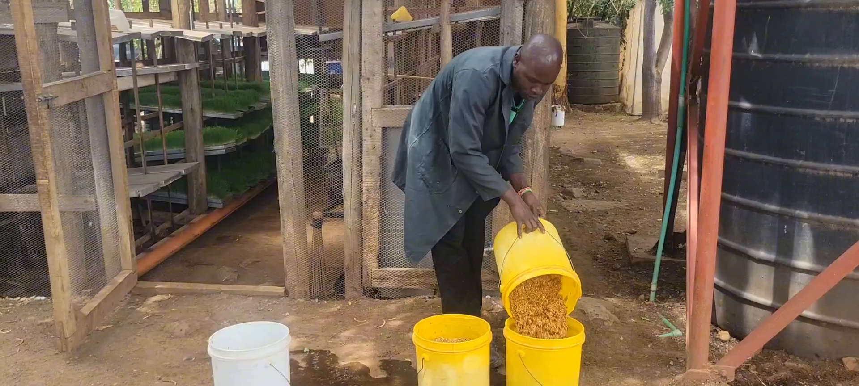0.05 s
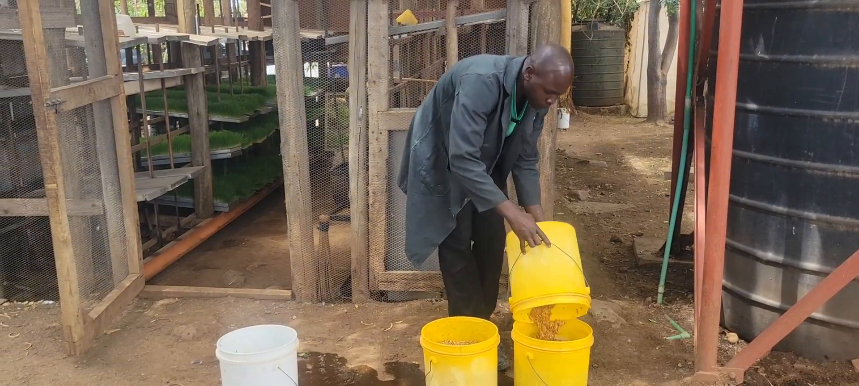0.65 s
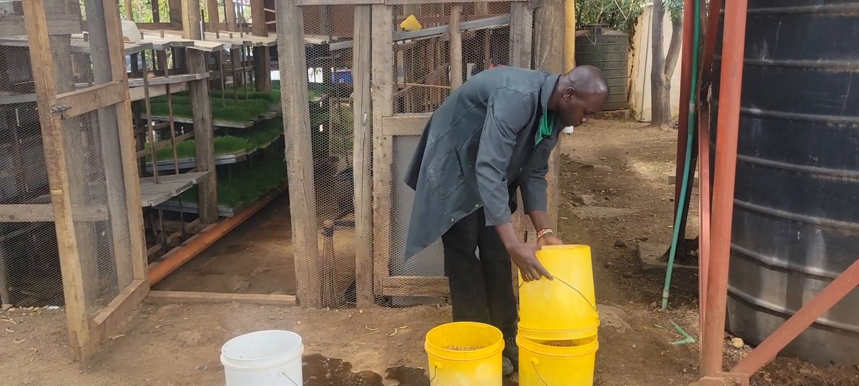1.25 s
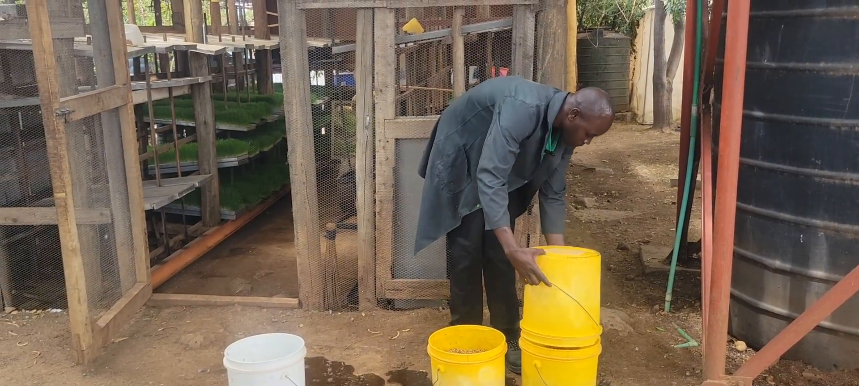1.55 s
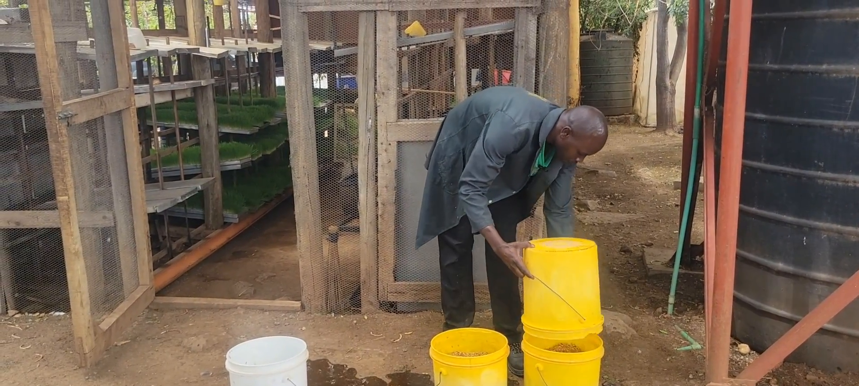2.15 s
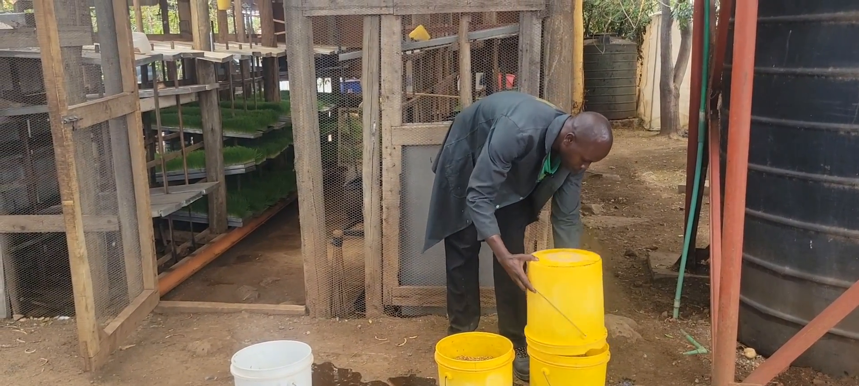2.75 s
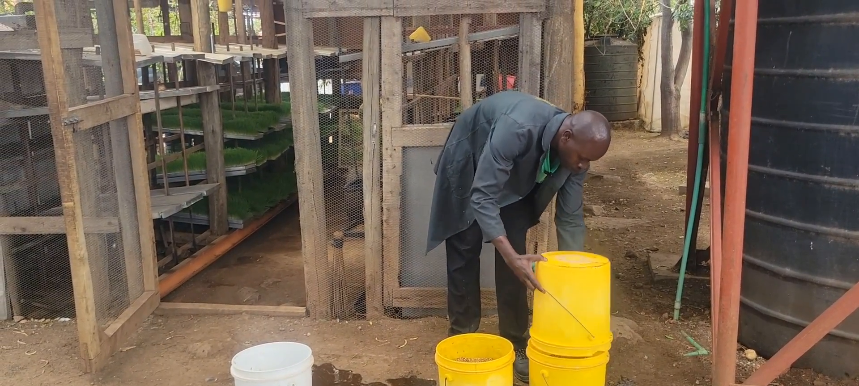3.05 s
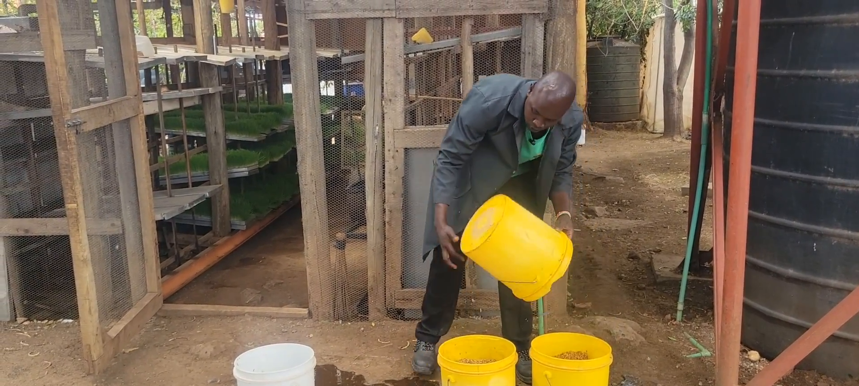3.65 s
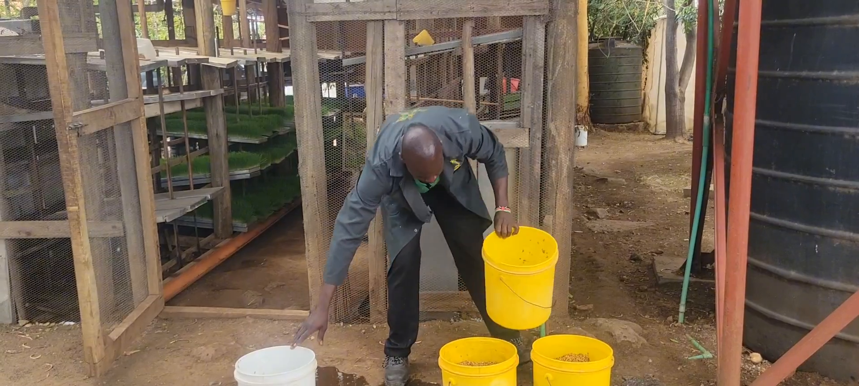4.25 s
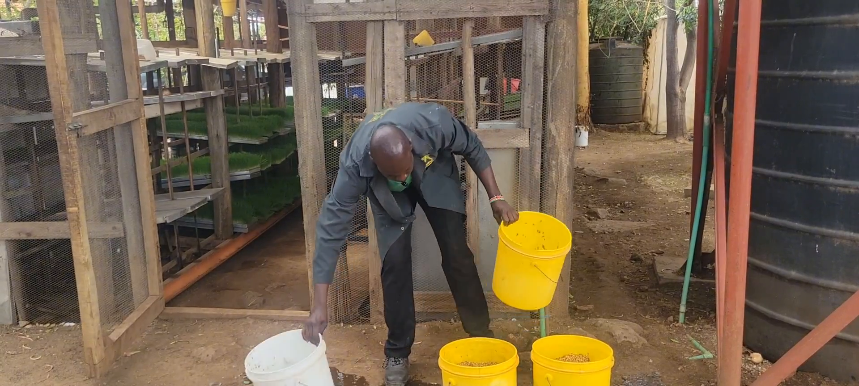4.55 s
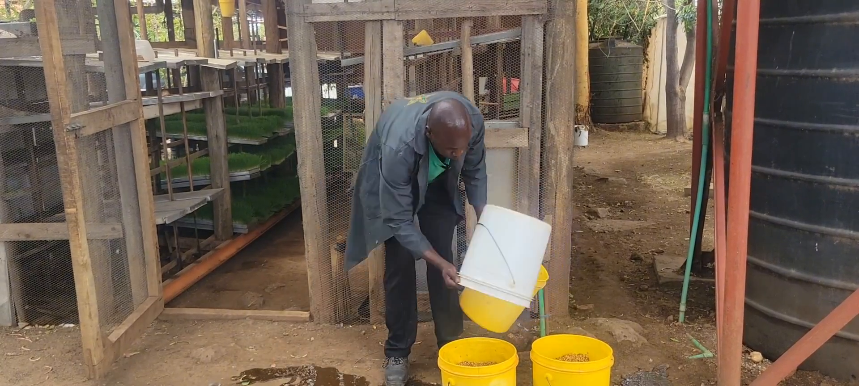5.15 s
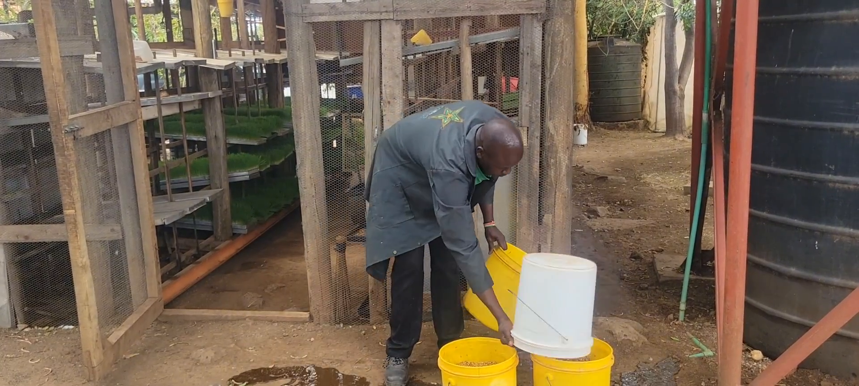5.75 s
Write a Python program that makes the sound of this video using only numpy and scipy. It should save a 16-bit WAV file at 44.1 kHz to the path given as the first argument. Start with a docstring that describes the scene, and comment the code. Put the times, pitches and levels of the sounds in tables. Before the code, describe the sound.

From the start, soaked grain patters and fizzes into a plastic bucket, with wet clumps sliding and light bumps near 0.6 and 0.9 seconds. The stream thins and ends just after 2 seconds. The upturned bucket is knocked on the full one's rim at about 1.8 seconds, then harder at 2.4, 2.9 and 3.1, each cluster a dry plastic clack with a hollow boom. Lighter taps follow around 3.7, and soft feet thud on earth between 4.2 and 4.7. Rustle and hiss swell from 4.7 as a second bucket is picked up, scraping and bumping. A small distant bird chirps faintly around 5.2 to 5.5. The bucket is banged down loudly at 5.6, and its wire handle clacks twice around 5.7. The knocks sound fairly close, with a short, dull echo from a shed, over quiet outdoor air and a faint, distant motor hum.

```python
"""A quiet yard in front of an open wooden shed. Soaked grain patters and fizzes out of one plastic bucket
into another. The upturned bucket is knocked on the full one's rim to shake the last grain loose, then
lifted away: its walls ring and its flexing base makes the air inside boom. A second bucket is picked up
and banged down, and its wire handle clacks. Feet thud, the shed gives a short echo, and far off a small
bird chirps and a motor hums. Under it lie soft rustle and hiss, swelling from about 4.7 s."""
import sys
import numpy as np
from scipy import signal
from scipy.fft import rfft, irfft, next_fast_len
from scipy.io import wavfile
from scipy.ndimage import uniform_filter1d

SR = 44100
rng = np.random.default_rng(int(sys.argv[2]) if len(sys.argv) > 2 else 0)


def pcm_store(signal):
    """Save signal as 16-bit PCM."""
    levels = np.round(np.clip(np.atleast_2d(signal), -1, 1) * 32767)
    wavfile.write(sys.argv[1], SR, levels.astype(np.int16).T)


N = 255647
TIME = np.arange(N) / SR
RING = TIME[:SR // 3]  # time axis of a single hit

# airy top shared by the wet grain and the background hiss: (frequency [Hz], level [dB])
HISS_COLOUR = [(3500, -18), (7000, -0.5), (11000, 0.5), (14500, 4), (16000, 5)]
# resonances of the bucket the grain slides in: (frequency [Hz], width [Hz], level [dB])
GRAIN_BUCKET_HOLLOW = [(317, 300, -7.5), (603, 17, -1), (950, 15, -18), (1188, 20, 3.5), (1490, 360, -3.5),
                       (1754, 90, -14), (2600, 79, -20), (3930, 2500, -19.5), (5970, 590, -3.5),
                       (14600, 2100, 0.5)]


def undb(db):
    """Decibels to gain."""
    return 10 ** (np.asarray(db) / 20)


def unit(x):
    """Scale to rms 1."""
    return x / np.sqrt(np.mean(x ** 2))


def swell(rise, t60):
    """Hit envelope: a smooth attack to 1, then an exponential decay; both times in seconds."""
    attack = np.sin(np.pi / 2 * np.minimum(RING / rise, 1)) ** 2
    return attack * np.exp(-np.log(1000) * np.maximum(RING - rise, 0) / t60)


def add(track, s, sound):
    """Mix a sound in at s seconds."""
    i = max(int(s * SR), 0)
    track[i:i + len(sound)] += sound[:max(N - i, 0)]


def gains(curve):
    """A fader ride for each dB column, fading quickly outside the curve's time span."""
    s, *columns = np.transpose(curve)
    gate = np.clip(1 + np.minimum(TIME - s[0], s[-1] - TIME) / 0.11, 0, 1)
    return [gate * undb(np.interp(TIME, s, db)) for db in columns]


def colour(x, points, tilt_db=0):
    """EQ by a (Hz, dB) curve, tilted per octave and rolled off past both ends; rms 1."""
    hz, db = np.transpose(points)
    size = next_fast_len(len(x))
    f = np.maximum(np.fft.rfftfreq(size, 1 / SR), 1)
    shape = undb(np.interp(np.log(f), np.log(hz), db) + tilt_db * np.log2(f / 1000))
    roll_off = 1 / np.sqrt((1 + (hz[0] / f) ** 8) * (1 + (f / hz[-1]) ** 16))
    return unit(irfft(rfft(x, size) * shape * roll_off, size)[:len(x)])


def ticks(size, rate, spread_db):
    """Tiny impacts of uneven strength at random moments, about `rate` a second."""
    strength = undb(spread_db * np.minimum(rng.exponential(size=size), 3))
    return (rng.random(size) < rate / SR) * strength * rng.choice([-1, 1], size)


def flutter(rate_hz):
    """Smooth random wander; rms 1."""
    hold = int(SR / rate_hz)
    steps = np.repeat(rng.standard_normal(N // hold + 1), hold)
    return unit(uniform_filter1d(steps, hold)[:N])


def hollow(x, resonances):
    """Add a bucket's resonant peaks to a sound made in it; rms 1."""
    peaks = sum(undb(db) * signal.lfilter(*signal.iirpeak(hz, hz / width, fs=SR), x)
                for hz, width, db in resonances)
    return unit(x + peaks)


def damped_notes(events, rise, t60):
    """One heavily damped sine for each event."""
    out = np.zeros(N)
    for s, hz, db in events:
        add(out, s, undb(db) * swell(rise, t60) * np.sin(2 * np.pi * hz * RING))
    return out


def yard(air_db=-52.5):
    """A bed of quiet outdoor air and the faint, wavering hum of a distant motor."""
    # motor partials: (frequency [Hz], level [dB])
    partials = [(399, -63), (801, -66), (1200, -68)]
    # outdoor air: (frequency [Hz], level [dB])
    air_colour = [(30, -3), (70, -12), (140, 2), (280, -3.5), (550, -8), (1000, -17), (1500, -18),
                  (2750, -26.5), (14400, -33), (16000, -32)]
    hum = sum(undb(db + 2 * flutter(9.4)) * np.sqrt(2) * np.sin(2 * np.pi * hz * TIME)
              for hz, db in partials)
    return hum + undb(air_db) * colour(rng.standard_normal(N), air_colour)


def pour(patter_db=-1, rattle_db=-2, fizz_db=3, surge_db=1):
    """Kernels tumble unevenly onto the heap in the bucket; their wet skins fizz as they part."""
    # the stream of grain: (time [s], flow level [dB], fizz level [dB])
    stream = [(0.0, -27, -29.5), (0.08, -30.5, -41), (0.29, -35, -44.5), (0.91, -38.5, -48),
              (1.24, -43, -53), (1.51, -42.5, -52), (1.66, -38.5, -46), (1.83, -40, -48.5),
              (1.98, -41, -49.5), (2.15, -52, -60)]
    # kernels landing on the heap: (frequency [Hz], level [dB])
    patter_colour = [(110, -2.5), (180, 4), (350, -3), (500, -2), (850, -1), (1400, -6), (1900, -5.5),
                     (2700, -9), (4500, -10), (7000, -21), (9000, -62)]
    # kernels bouncing on hard plastic: (frequency [Hz], level [dB])
    rattle_colour = [(2000, -6), (2700, 6.5), (3400, 1), (4200, -4), (5200, -17)]
    flow, wet = gains(stream)
    patter = hollow(colour(ticks(N, rate=6000, spread_db=2.5), patter_colour), GRAIN_BUCKET_HOLLOW)
    fizz = colour(ticks(N, rate=13000, spread_db=4.5), HISS_COLOUR)
    # only a fast stream throws kernels against the wall
    rattle = colour(ticks(N, rate=3700, spread_db=5), rattle_colour) * flow / flow.max()
    impacts = undb(patter_db) * patter + undb(rattle_db) * rattle
    surge = undb(surge_db * flutter(38.26))
    return (flow * impacts + undb(fizz_db) * wet * fizz) * surge


def rustle_and_rumble(rustle_db=-2, rumble_db=1):
    """Soft rustle and hiss, the background noise swelling from about 4.7 s; carried buckets rumble."""
    # rustle and background noise: (time [s], rustle level [dB], hiss level [dB])
    noise_ride = [(2.15, -46.5, -55), (2.41, -49.5, -54), (2.56, -41, -45), (2.72, -54, -51),
                  (3.09, -42.5, -50), (3.24, -49.5, -54.5), (3.7, -45.5, -54.5), (4.01, -55.5, -61),
                  (4.28, -53.5, -56.5), (4.79, -41, -48), (4.94, -37, -44), (5.24, -43.5, -44.5),
                  (5.66, -36.5, -43), (5.75, -36.5, -45)]
    # body of the rustle: (frequency [Hz], level [dB])
    rustle_colour = [(120, -26), (215, 1), (320, -14), (480, -17.5), (700, -7.5), (1100, -10),
                     (1500, -11.5), (2200, -15), (3700, -17.5), (5900, -20.5), (9000, -35)]
    # rumble of the carried buckets: (time [s], level [dB])
    rumble_ride = [(0.0, -35), (0.19, -49.5), (0.89, -40), (1.35, -47.5), (1.84, -29), (2.11, -50.5),
                   (2.44, -65), (2.52, -39.5), (2.91, -59), (3.05, -41), (3.18, -53), (3.46, -47.5),
                   (4.23, -57), (4.36, -41.5), (4.71, -48.5), (4.84, -35.5), (5.21, -40.5), (5.8, -42)]
    # tone of that rumble: (frequency [Hz], level [dB])
    rumble_colour = [(25, -8), (45, -3.5), (65, 7), (110, 4), (160, 0), (220, -3.5), (330, -9.5),
                     (500, -3.5)]
    rustle_gain, hiss_gain = gains(noise_ride)
    rustle = colour(ticks(N, rate=9000, spread_db=3.5), rustle_colour) * undb(flutter(30))
    hiss = colour(ticks(N, rate=36000, spread_db=6.0), HISS_COLOUR) * undb(flutter(45))
    rumble = colour(rng.standard_normal(N), rumble_colour) * gains(rumble_ride)[0]
    return undb(rustle_db) * rustle_gain * rustle + hiss_gain * hiss + undb(rumble_db) * rumble


def slides(events, resonances, attack_share=0.088):
    """Short runs of dense tiny contacts, coloured by the bucket; longer runs build up more slowly."""
    # friction on plastic: (frequency [Hz], level [dB])
    friction_colour = [(300, 12.5), (700, 9.5), (1700, 10.5), (2300, 3.5), (4200, 4), (6000, -3.5),
                       (8000, -2.5), (11500, -8), (14500, -10), (16000, -22)]
    out = np.zeros(N)
    for s, db, t60, tilt_db in events:
        contacts = colour(ticks(len(RING), rate=8300, spread_db=2.5), friction_colour, tilt_db)
        add(out, s, undb(db) * swell(attack_share * t60, t60) * hollow(contacts, resonances))
    return out


def knocks(blows, modes, modes_db, crack_db, crowd_db):
    """Each blow builds while the contact lasts, then rings the main modes and a crowd of weak ones."""
    # the crowd of weak wall modes: (frequency [Hz], level [dB])
    crowd_colour = [(120, 19), (250, 12.5), (650, 2.5), (1500, -1.5), (2400, -13), (3900, -11.5),
                    (6000, -21), (10000, -32.5), (15000, -35)]
    firm_contact_s, firm_t60_s, crack_t60_s = 0.00088, 0.088, 0.02
    out = np.zeros(N)
    hz, db, mode_t60 = np.transpose(modes)
    crack = 1 + undb(crack_db) * np.exp(-np.log(1000) * RING / crack_t60_s)
    character = rng.standard_normal(len(RING))  # the part of the crowd that repeats at every blow
    for s, blow_db, tilt_db, contact in blows:
        # a firm blow is brief and dies fast; a softer one presses longer and lingers
        crowd_t60 = firm_t60_s * (contact / firm_contact_s) ** 0.4
        crowd = colour(character + rng.standard_normal(len(RING)), crowd_colour, tilt_db)
        wall = crowd * swell(contact, crowd_t60) * crack
        # the soft wall detunes a little with the grip, and each spot moves the modes differently
        pitch = hz * (1 + 0.008 * rng.standard_normal(len(hz)))
        weights = undb(db + tilt_db * np.log2(hz / hz[0]))
        ring = sum(weight * np.sin(2 * np.pi * (f * RING + rng.random())) * swell(contact, t60)
                   for weight, f, t60 in zip(weights, pitch, mode_t60))
        ring /= np.linalg.norm(weights)
        add(out, s, undb(blow_db) * (undb(crowd_db) * wall + undb(modes_db) * ring))
    return out


def grain_bucket():
    """Wet clumps slide off the upturned bucket's wall, which rings as it is knocked on the full one."""
    # sliding clumps: (time [s], level [dB], decay t60 [s], brightness [dB/octave])
    clumps = [(.003, -18, 0.089, 11), (.02, -30, 1, 0.5), (.14, -28.5, 0.34, 1.5), (.31, -33.5, 0.18, 1),
              (.585, -27, 0.27, 2), (.622, -21, 0.16, 0), (.636, -21, 0.12, 22), (.885, -36.5, 0.26, 4.5),
              (.95, -38, 0.43, 2), (1.22, -40.5, 0.17, 2), (1.48, -39, 0.27, -0.5), (1.68, -35, 0.33, -3),
              (1.7, -36.5, 0.32, 14), (2.367, -43, 0.045, 12), (2.413, -9.5, 0.11, 2),
              (2.44, -29, 0.46, 1.5), (2.53, -31, 0.33, 2.5), (2.555, -23, 0.018, 9),
              (2.6, -33.5, 0.47, 0.5), (2.887, -29.5, 0.094, 14), (2.93, -35.5, 0.097, 6),
              (3.088, -29.5, 0.15, 4.5), (3.107, -20, 0.037, 2), (3.675, -24.5, 0.028, 4),
              (4.016, -45.5, 0.17, 8.5), (4.05, -37.5, 0.15, 9.5)]
    # blows on the bucket: (time [s], level [dB], brightness [dB/octave], contact [s])
    blows = [(.572, -25.5, 1, 0.019), (.87, -28.5, 0, .021), (1.7695, -23.5, 1, .0006),
             (1.7875, -19.5, 0, .0003), (1.862, -29, -2, 0.011), (2.144, -44, 4, 0.0033),
             (2.262, -42.5, 3.5, 0.0061), (2.399, -19, 4.5, 0.0018), (2.405, -9.5, 0, .0003),
             (2.4215, -14.5, -1, 0.0013), (2.436, -10, -7, 0.0053), (2.609, -31.5, 11, 0.0028),
             (2.636, -30.5, 1.5, 0.0044), (2.8685, -7.5, 1, 0.000083), (2.877, -7.5, -1.5, 0.0022),
             (2.888, -13.5, 1, 0.00062), (2.932, -20, -0.5, 0.0043), (3.0625, -14.5, 0, 0.00058),
             (3.0805, -14.5, 2.5, 0.000072), (3.0915, -6.5, -3.5, .001), (3.109, -8.5, -2, 0.00028),
             (3.275, -43.5, 4, 0.0044), (3.6095, -35, 1.5, 0.00093), (3.66, -30, 1, .002),
             (3.675, -21.5, -1, 0.0038)]
    # its wall modes: (frequency [Hz], level [dB], decay t60 [s])
    modes = [(334.5, -3.5, 0.15), (414, -9.5, 0.24), (531.6, 0.5, 0.063), (591, 4, 0.038), (690, -7, 0.085),
             (810, -11, 0.069), (955, 1, 0.038), (1252, -3, 0.025), (1376, -4, 0.089), (1840, -19, 0.15),
             (2420, -13, 0.11), (3770, -18, 0.08), (4000, -3, 0.01), (5170, -38, 0.043), (6400, -17, 0.055)]
    hits = knocks(blows, modes, modes_db=-2.5, crack_db=-9.0, crowd_db=0.5)
    return hits + slides(clumps, GRAIN_BUCKET_HOLLOW)


def filling(start_s=0.21, end_s=0.48, start_hz=305, end_hz=410, db=-40):
    """Falling grain sounds the air above the heap: a rough, faint note that rises as the bucket fills."""
    count = int((end_s - start_s) * SR)
    phase = 2 * np.pi * np.cumsum(np.geomspace(start_hz, end_hz, count)) / SR
    air = flutter(42.4)[:count] * np.sin(phase) + flutter(44)[:count] * np.cos(phase)
    out = np.zeros(N)
    add(out, start_s, undb(db) * np.sqrt(np.hanning(count)) * air)
    return out


def booms(t60=0.12, scatter_db=5):
    """A flexing base pumps the air in its bucket: close low modes swell and beat."""
    # shoves on a base, pitched by the bucket and by how its mouth is covered:
    # (time [s], pitch [Hz], level [dB], attack [s])
    shoves = [(0.574, 231.3, -20, .019), (1.769, 146.5, -1, 0.024), (1.876, 129.4, -6, 0.016),
              (1.951, 108, -20, 0.02), (2.428, 141.8, -4, 0.032), (2.621, 139, -17, 0.014),
              (2.869, 144.2, 3.5, 0.025), (3.068, 140.3, 1.5, .015), (3.112, 167, 2.5, 0.01),
              (3.41, 148, -13.5, 0.014), (3.675, 159, -32, 0.0095), (4.502, 224, -31, 0.03),
              (4.678, 220, -24, 0.033), (4.914, 351, -24, .025), (4.921, 231, -17, 0.03),
              (5.428, 218, -22.5, 0.007), (5.56, 202.1, -3.5, 0.032), (5.7, 207, -24, 0.012)]
    # air modes of a bucket: (frequency [multiple of the pitch], level [dB])
    air_modes = [(.77, -3.5), (1, 0.5), (1.2, -10.5), (2.17, -26.5)]
    out = np.zeros(N)
    ratio, mode_db = np.transpose(air_modes)
    for s, hz, db, rise in shoves:
        weights = undb(mode_db + scatter_db * rng.standard_normal(len(ratio)))
        air = weights @ np.sin(2 * np.pi * hz * np.outer(ratio, RING)) / np.linalg.norm(weights)
        add(out, s, undb(db) * swell(rise, t60) * air)
    return out


def thuds():
    """A rim settles and feet land on packed earth: dull, low notes with a soft attack."""
    # soft landings: (time [s], pitch [Hz], level [dB])
    landings = [(.879, 124, -14.5), (.885, 74, -15.5), (4.208, 70, -26.5), (4.286, 77, -24),
                (4.654, 64, -26.5)]
    return damped_notes(landings, rise=0.0334, t60=0.029)


def wall_buckles():
    """The hardest blows buckle a patch of plastic wall with a dry clack."""
    # buckling patches: (time [s], pitch [Hz], level [dB])
    clacks = [(2.405, 622, -3), (2.406, 900, -8.5), (2.421, 960, -6.5), (2.422, 1820, -14),
              (2.869, 630, -9.5), (2.876, 778, -7), (2.937, 1105, -17.5), (5.5585, 587, -7)]
    return damped_notes(clacks, rise=0.0013, t60=0.035)


def second_bucket():
    """The second bucket scrapes as it is picked up, and its wall rings as it is banged down."""
    # rubs on hand, wire and rim: (time [s], level [dB], decay t60 [s], brightness [dB/octave])
    scrapes = [(4.4, -43.5, 0.32, -1.5), (4.795, -36.5, .25, 4), (4.84, -36, 0.82, -2.5),
               (5.055, -38.5, 0.33, -1), (5.574, -24, .085, 4), (5.6, -21, 0.09, 6),
               (5.696, -18.5, 0.02, 18), (5.735, -27, 0.13, 4)]
    # resonances the rubbing excites: (frequency [Hz], width [Hz], level [dB])
    resonances = [(380, 110, 15), (796, 24, 14), (1560, 130, -3), (1780, 81, -13), (2190, 160, 14),
                  (3660, 83, 14), (4000, 160, -5), (9000, 2100, 6), (13900, 3200, 8)]
    # blows on the bucket: (time [s], level [dB], brightness [dB/octave], contact [s])
    blows = [(4.67, -34.5, 3, 0.021), (4.91, -21, -3, 0.013), (5.08, -36, 8, 0.019), (5.316, -27, 0, 0.012),
             (5.414, -27.5, 3, 0.02), (5.558, -3.5, 0, 0.00098), (5.566, -10, 1.5, 0.0028),
             (5.577, -3.5, 3, 0.00086), (5.6028, -1, 1.5, 0.00027), (5.611, -15, 3.5, 0.0021),
             (5.683, -15, 2, .003)]
    # its wall modes: (frequency [Hz], level [dB], decay t60 [s])
    modes = [(297, 4, 0.17), (536, 2.5, 0.06), (664, 2.5, 0.042), (779, 1, 0.084), (1090, -19, 0.066),
             (1330, -30, 0.054), (1643, -7.5, 0.13), (2140, -13, 0.052), (3150, -6.5, 0.031),
             (3370, -14, 0.12), (4080, -11, 0.11)]
    hits = knocks(blows, modes, modes_db=-7, crack_db=-3.5, crowd_db=-7.0)
    return hits + slides(scrapes, resonances)


def bird():
    """A small, distant bird gives short, pure, falling whistles."""
    # bird notes: (time [s], length [s], start pitch [Hz], end pitch [Hz], level [dB])
    chirps = [(5.225, 0.067, 3700, 3640, -47.5), (5.446, 0.034, 3600, 2680, -36.5),
              (5.474, 0.034, 3300, 2700, -42)]
    out = np.zeros(N)
    for s, length, start_hz, end_hz, db in chirps:
        hz = np.geomspace(start_hz, end_hz, int(length * SR))
        whistle = np.sin(2 * np.pi * np.cumsum(hz) / SR)
        add(out, s, undb(db) * np.hanning(len(hz)) * whistle)
    return out


def wire_handle():
    """The wire handle strikes the bucket wall twice with a short, bright ring."""
    # handle strikes: (time [s], level [dB], brightness [dB/octave], contact [s])
    strikes = [(5.6997, -8, 5, 0.001), (5.745, -17, 1.5, 0.0005)]
    # handle modes: (frequency [Hz], level [dB], decay t60 [s])
    modes = [(664, 4, 0.041), (955, 5, 0.039), (1325, 7, 0.033), (1546, -6, 0.1), (1660, 2, 0.032),
             (2950, -4.5, 0.026), (3440, 0, 0.027), (8900, -8.5, 0.0082), (9700, -8, 0.0067)]
    return knocks(strikes, modes, modes_db=5.0, crack_db=-21, crowd_db=-13.5)


def shed(x, t60=0.26):
    """The shed's boards and a tank throw back a short, dull echo."""
    wet_gain = undb(-15) / 2
    echo_colour = [(150, 5.5), (1500, 1.5), (5000, -6.0), (16000, -30)]  # (frequency [Hz], level [dB])
    echo = colour(rng.standard_normal(len(RING)), echo_colour) * swell(0.012, t60)
    return x + wet_gain * signal.fftconvolve(x, echo / np.linalg.norm(echo))[:N]


def scene():
    """Mono mix: buckets, thuds and bird echo off the shed; the pour and the noise beds stay dry."""
    buckets = grain_bucket() + second_bucket() + wire_handle() + booms() + wall_buckles()
    return (shed(buckets + thuds() + bird()) + pour() + rustle_and_rumble() + yard() + filling())[None]


def record(dry, low_cut_hz=32, high_cut_hz=15700):
    """Soft-clip the loudest peaks, then cut the deepest bass and the very top."""
    rounded = dry / (1 + dry ** 6) ** (1 / 6)
    low_cut = signal.butter(2, low_cut_hz, "high", fs=SR, output="sos")
    high_cut = signal.ellip(10, .2, 80, high_cut_hz, fs=SR, output="sos")
    return signal.sosfilt(high_cut, signal.sosfilt(low_cut, rounded))


dry = scene()
out = record(dry)
pcm_store(out)
```